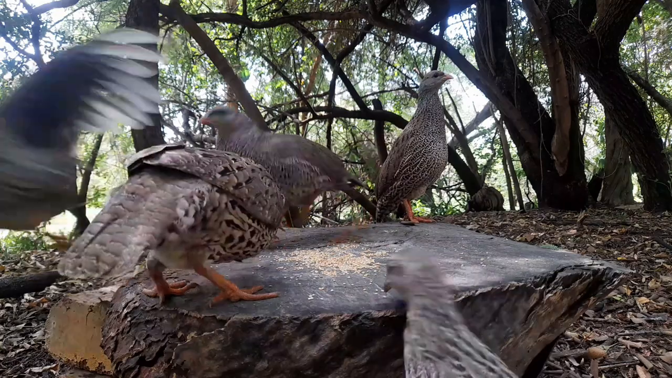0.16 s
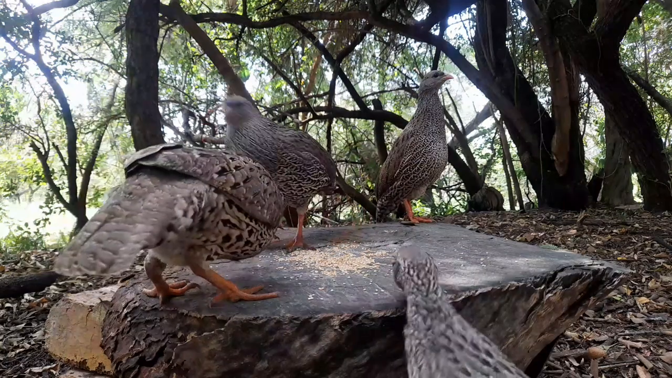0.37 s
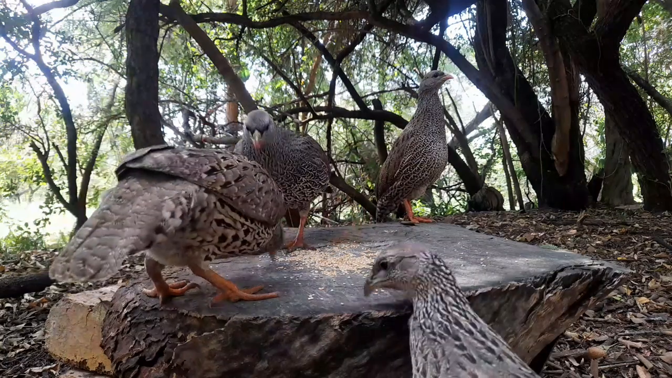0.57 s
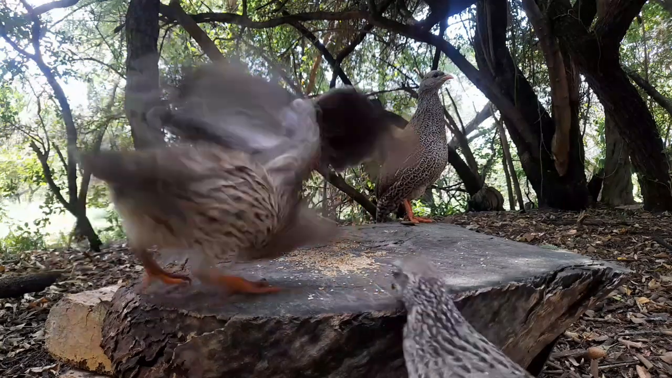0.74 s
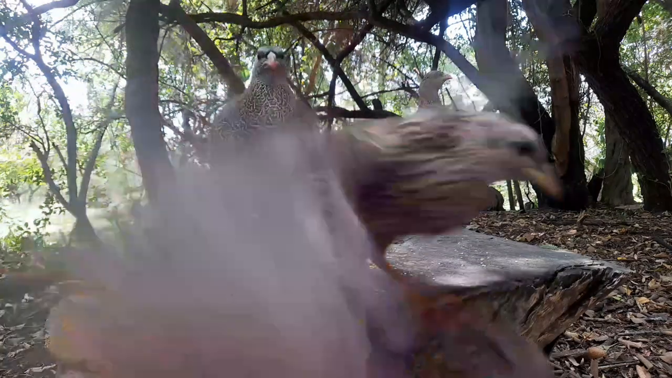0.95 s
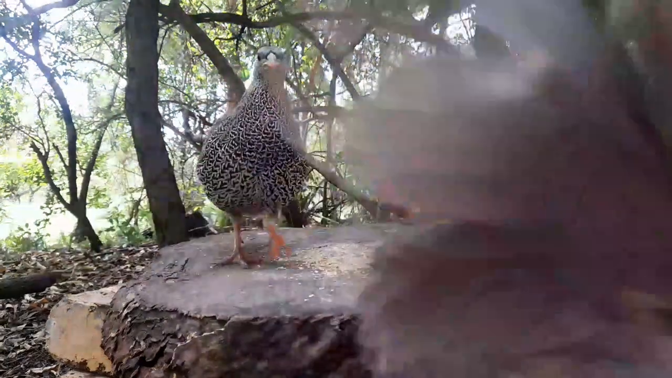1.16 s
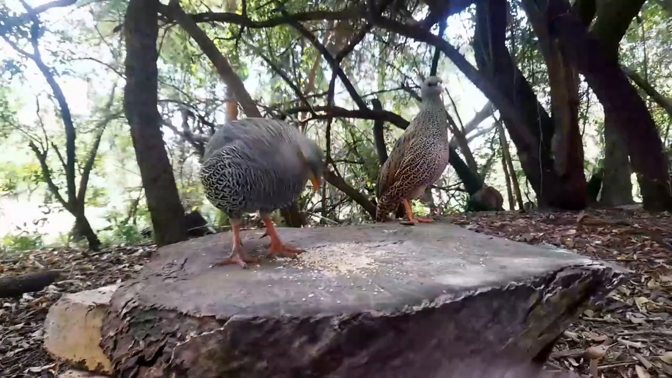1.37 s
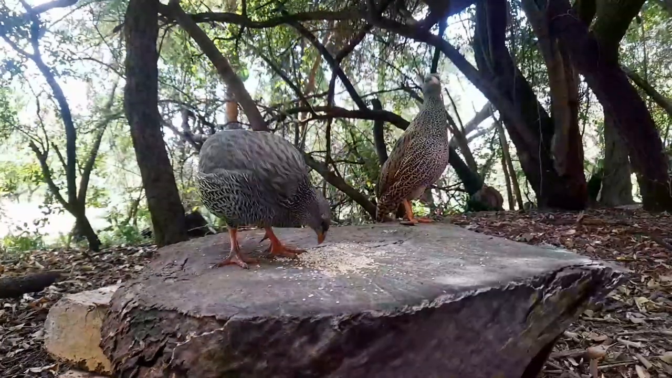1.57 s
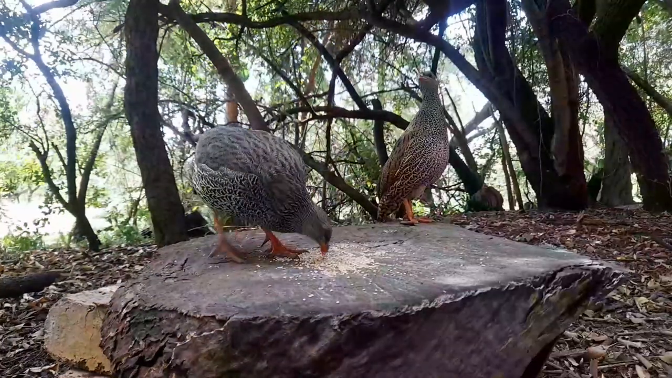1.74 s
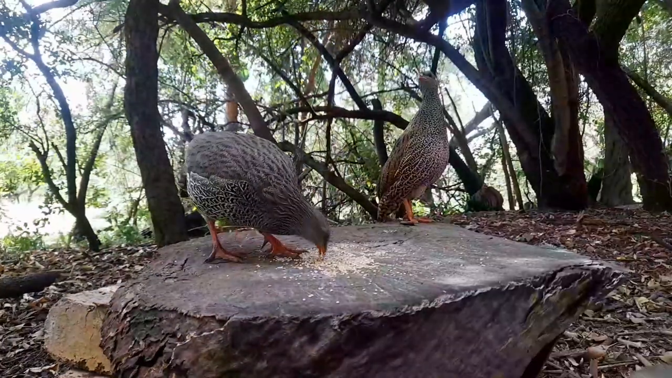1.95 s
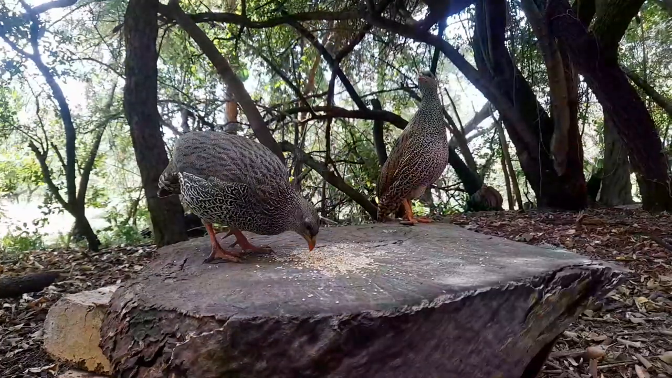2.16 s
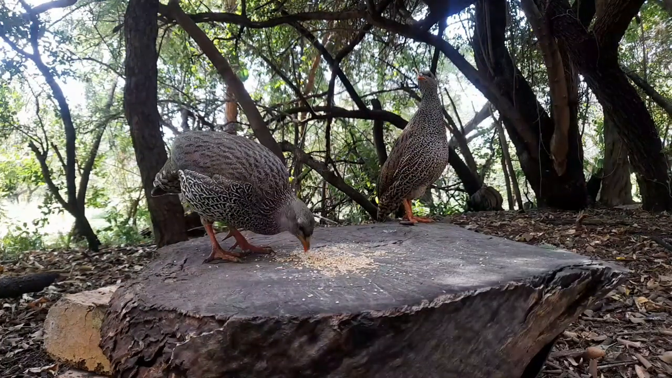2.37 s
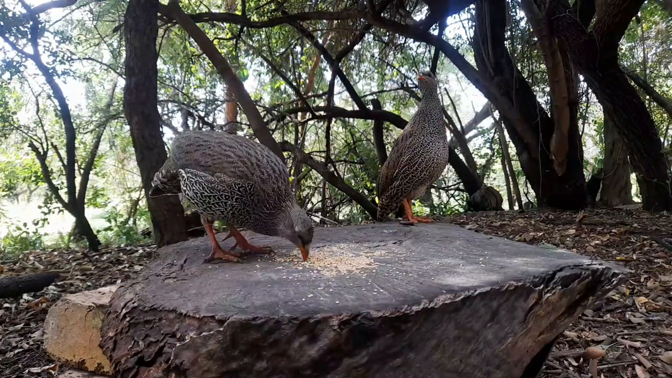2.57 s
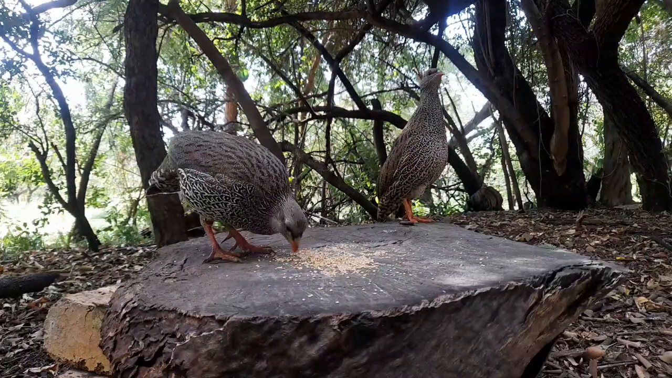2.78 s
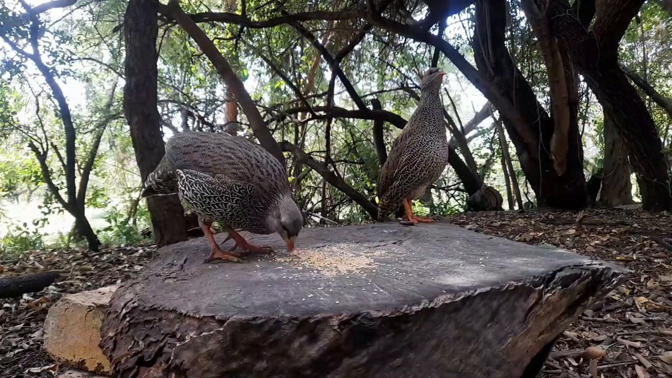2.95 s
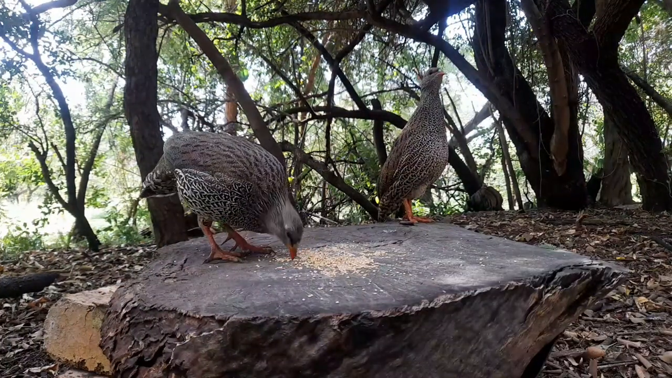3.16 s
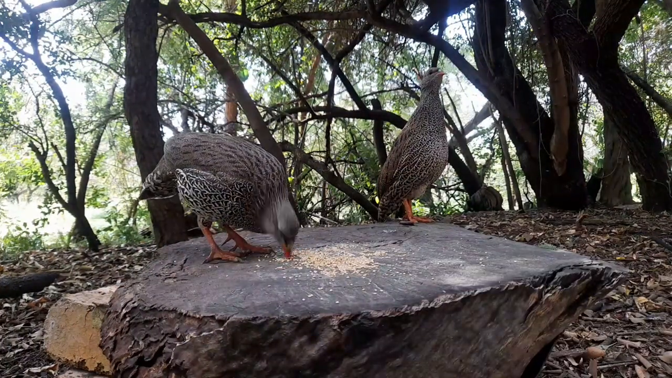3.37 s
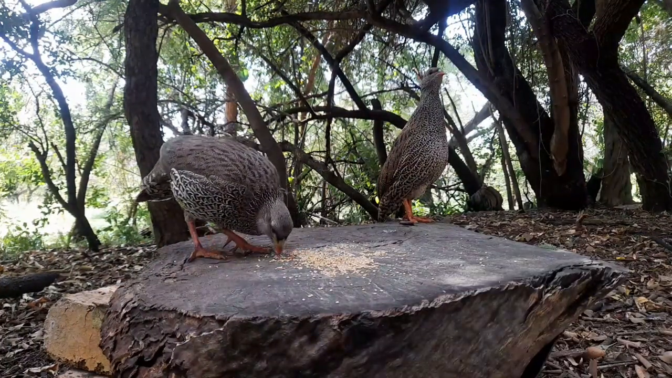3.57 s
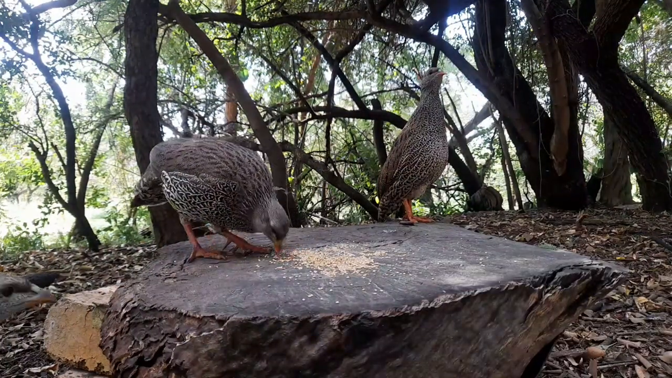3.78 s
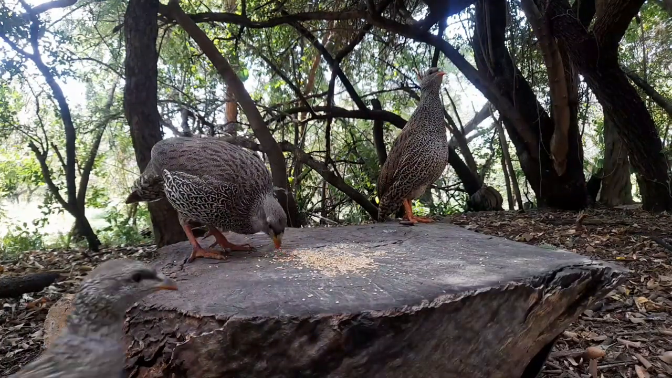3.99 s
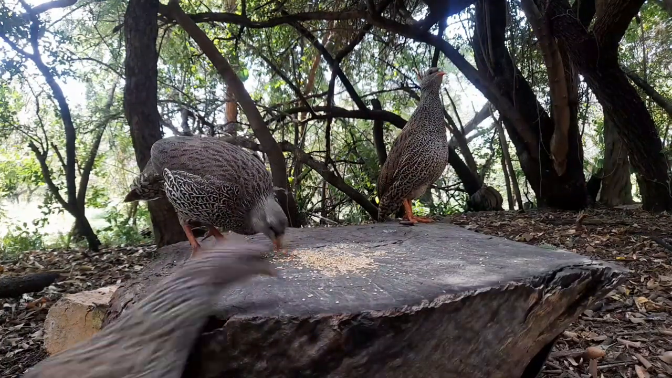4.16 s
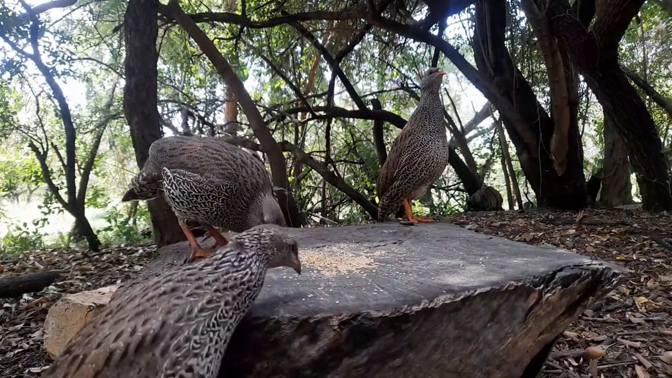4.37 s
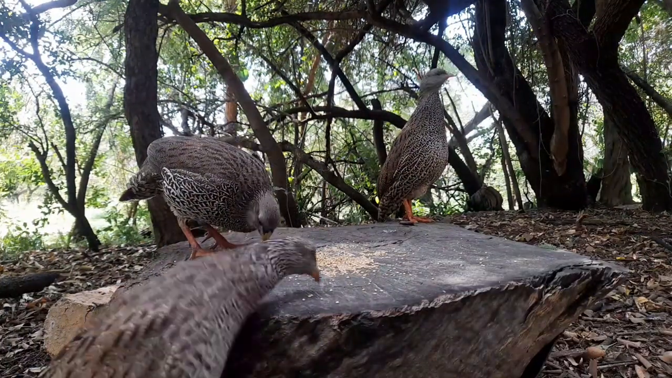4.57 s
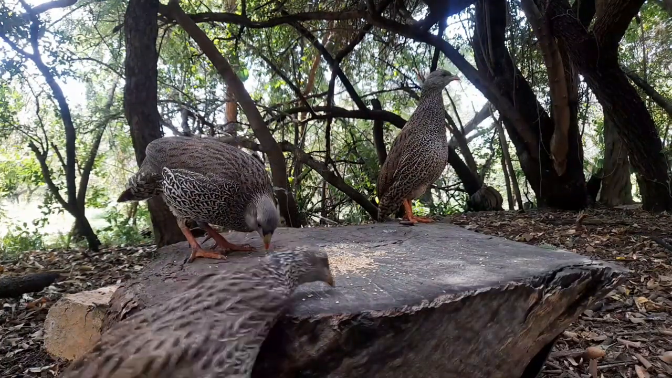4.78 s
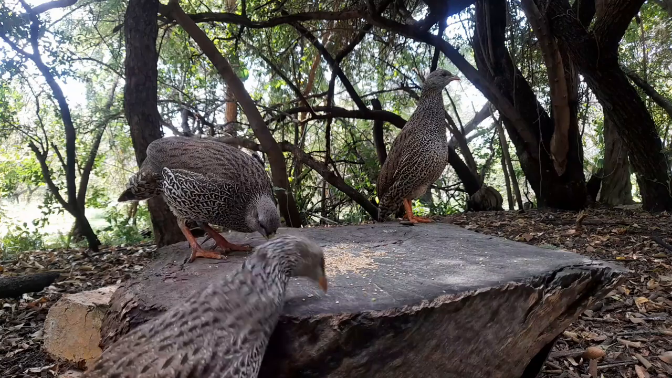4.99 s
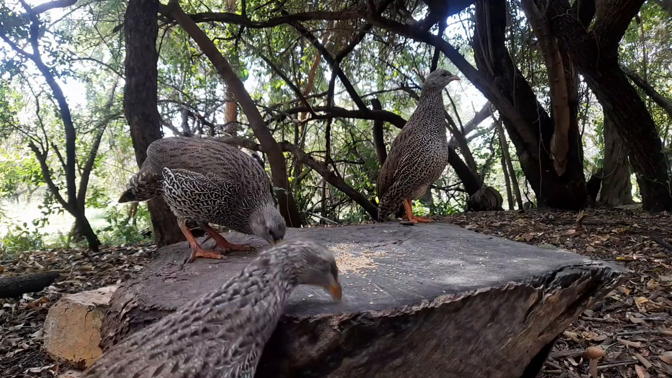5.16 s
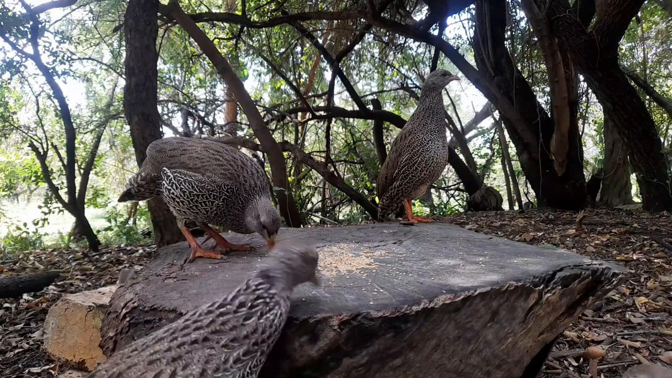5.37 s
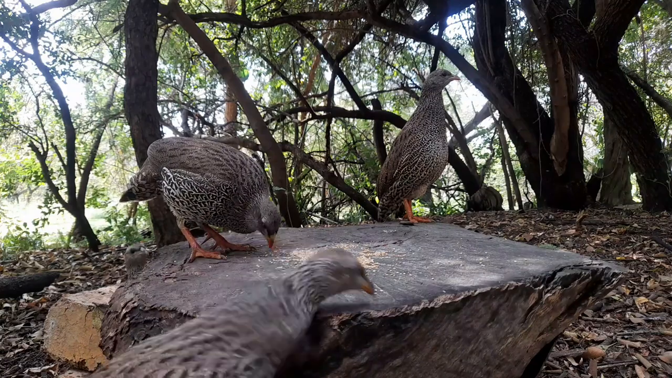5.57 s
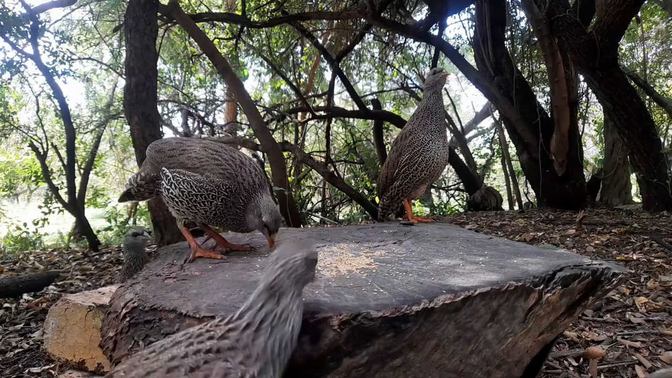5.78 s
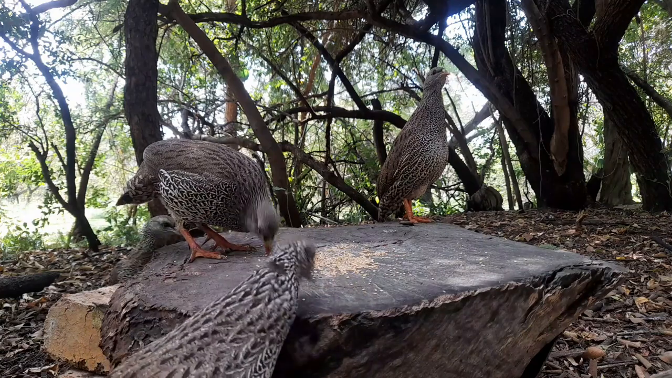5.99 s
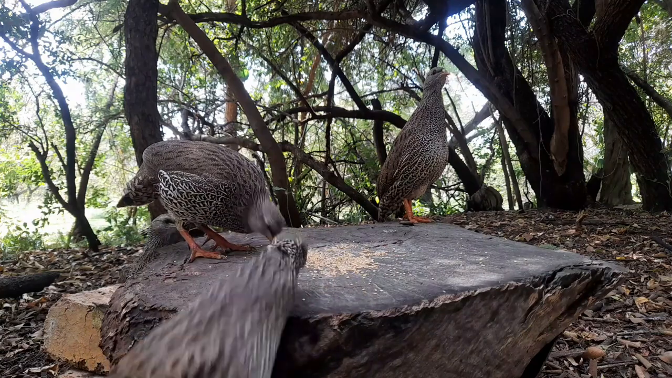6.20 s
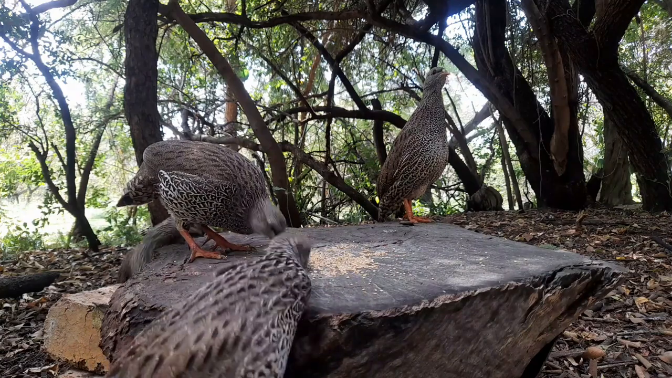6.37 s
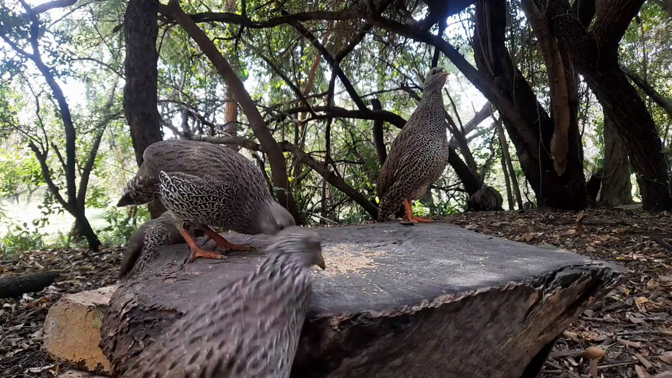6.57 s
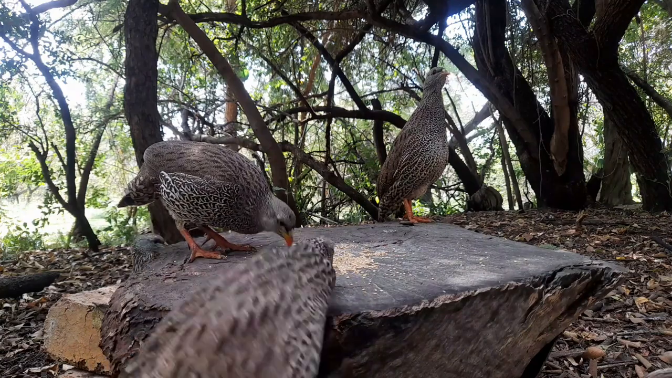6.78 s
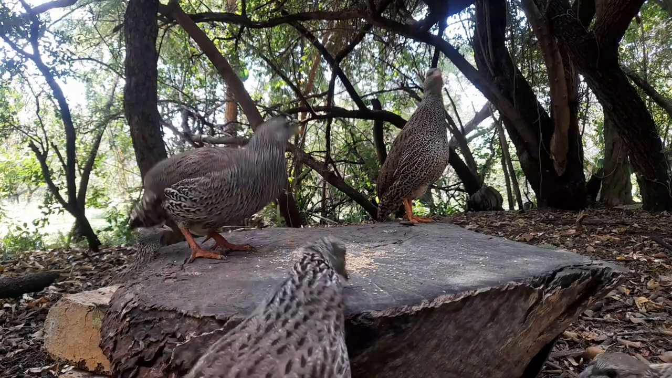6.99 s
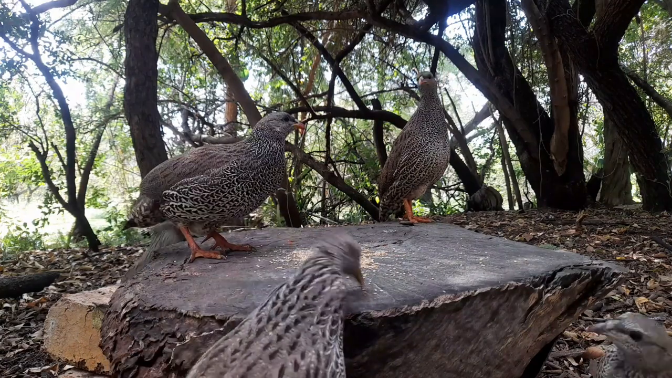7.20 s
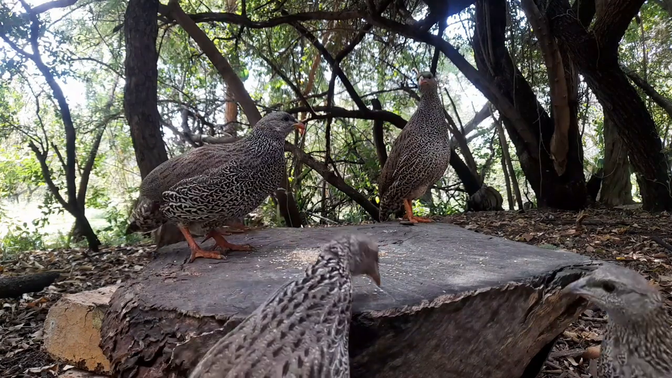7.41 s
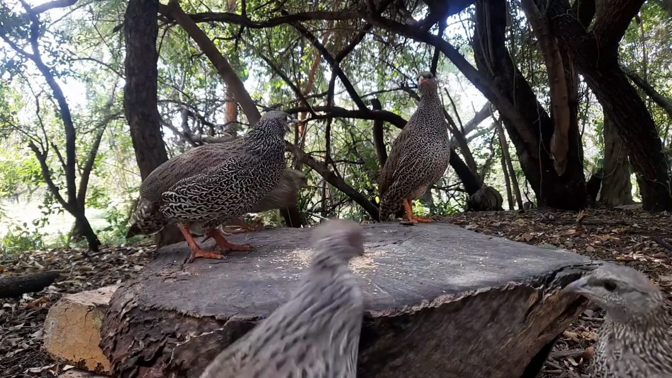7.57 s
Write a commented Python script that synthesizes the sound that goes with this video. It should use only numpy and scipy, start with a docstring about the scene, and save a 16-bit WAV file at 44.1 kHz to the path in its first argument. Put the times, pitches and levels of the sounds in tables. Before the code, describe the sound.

Several ground birds feed at a wooden stump in quiet woods. Bright, short peeps slide down and flick upward. Within the first second one bird is driven off with piercing screams and heavy wingbeats right beside the microphone. Then it calms to sparse, fainter peeps, beak ticks, leaf rustle and dull wooden taps, with peeping growing busier and a few hoarse clucks in the middle. Near calls are almost dry, with a soft tree echo.

```python
"""Short peeping whistles that fall and then flick up come from ground fowl crowding round seed on a stump.
One bird is chased off with screams and wingbeats close to the microphones; a farther bird trills.
Calls are gliding tones with overtones and breath noise; feathers, litter, wings and a low murmur of air
are shaped noise; feet and beaks make the stump ring; trunks in the wood send back a soft echo."""
import sys
import numpy as np
from scipy import signal
from scipy.io import wavfile
from scipy.ndimage import uniform_filter1d

SR = 44100
rng = np.random.default_rng(int(sys.argv[2]) if len(sys.argv) > 2 else 0)


def volts_from_decibels(level):
    """Turn decibel levels (scalar or array-like) into linear amplitude factors."""
    exponent = np.asarray(level, float) / 20
    return 10 ** exponent


def to_wav(s):
    """Save 16-bit WAV."""
    ch = np.atleast_2d(s).T  # columns
    pcm = np.round(np.clip(ch, -1, 1) * 32767)  # PCM
    wavfile.write(sys.argv[1], SR, pcm.astype(np.int16))


N = 336924   # samples in the scene


def size_of(s):
    """Samples in a time in seconds."""
    return round(s * SR)


def rms_one(x):
    """Scales a signal to an rms of 1."""
    return x / np.sqrt(np.mean(x ** 2) + 1e-20)


def band_noise(noise, order, low_hz, high_hz):
    """Noise kept only between two frequencies."""
    return signal.sosfilt(signal.butter(order, [low_hz, high_hz], "band", fs=SR, output="sos"), noise)


def drift(rate_hz):
    """Slow random wandering with a spread of 1; a higher rate wanders faster."""
    # made at one point per 40 samples, after a run-in, then joined by straight lines
    r = np.exp(-80 * np.pi * rate_hz / SR)
    slow = signal.lfilter([1], [1, -2 * r, r * r], rng.standard_normal(N // 40 + 2002))[2000:]
    return np.interp(np.arange(N) / 40, np.arange(len(slow)), rms_one(slow))


def curve(rows):
    """Turns rows of (seconds, dB) into a gain for every sample."""
    s, db = np.transpose(rows)
    return volts_from_decibels(np.interp(np.arange(N) / SR, s, db))


def coloured(spectrum, patchy_db, source):
    """Stereo noise in half-octave bands, each with its own level, flicker and left-right likeness; rms 1."""
    # How alike left and right are. Each row: frequency in Hz, likeness from 0 to 1.
    likeness = [(100, .65), (700, 0.45), (5000, 0.03)]
    out, edges = 0, 30 * 2 ** np.arange(0, 9.6, .5)
    for k, (low, high) in enumerate(zip(edges, edges[1:])):
        # neighbouring bands take turns between two pairs of noises
        mid, side = band_noise(source[k % 2], 2, low, high)
        middle = np.log(low * high) / 2
        level_db, alike = (np.interp(middle, np.log(np.array(p)[:, 0]), np.array(p)[:, 1])
                           for p in (spectrum, likeness))
        alike = np.clip(alike, 0, 1)
        stereo = np.sqrt(1 + alike) * mid + np.sqrt(1 - alike) * side * [[1], [-1]]
        out = out + volts_from_decibels(level_db + patchy_db * drift(22.0)) * stereo
    return rms_one(out)


def add(out, start_s, hz, db, overtone_db, pan_db, lag_ms, wobble_db, rough):
    """Adds a gliding whistle with overtones, shaken by breath noise, reaching one microphone before the other."""
    # Resonances and a notch that colour the overtones.
    # Each row: frequency in Hz, half width in Hz, lift in dB.
    tract = [(1550, 300, 6.0), (3400, 350, -7.0), (4800, 900, 5.5)]
    at, n = size_of(start_s), np.arange(len(hz))
    phase = 2 * np.pi * np.cumsum(hz) / SR
    tone = np.sin(phase)
    for k in range(2, 7):
        lift_db = sum(top_db / (1 + ((k * hz - at_hz) / width_hz) ** 2) for at_hz, width_hz, top_db in tract)
        # the throat passes overtones up to its edge in Hz and chokes them above
        passed = volts_from_decibels(overtone_db * (k - 1) ** .7 + lift_db) / (1 + (k * hz / 5800.0) ** 12)
        # choked overtones still leak out faintly, more from a loud call
        leak = volts_from_decibels(-22 + .4 * db) * (k * hz > 6800) * (k * hz < .4 * SR)
        tone += (passed + leak) * np.sin(k * phase)
    slow_breath = signal.butter(3, 900, fs=SR, output="sos")
    breath = rms_one(signal.sosfilt(slow_breath, rng.standard_normal(len(n))))
    tone = tone * (1 + rough * breath)
    soft_ends = np.minimum(1, np.minimum(n, n[::-1]) / 70)
    tone = tone * volts_from_decibels(db + wobble_db[max(at, 0) + n]) * soft_ends
    for side, sign in enumerate((1, -1)):   # left, then right
        heard = np.interp(n - sign * lag_ms * SR / 2000, n, tone) * volts_from_decibels(sign * pan_db / 2)
        out[side, max(at, 0):at + len(n)] += heard[max(-at, 0):]


def murmur():
    """A low murmur of air: coloured noise that swells in slow gusts."""
    # Strength of the gusts. Each row: time in seconds, level in dB before a small random drift.
    gusts = [(0, -60), (.7, -64), (1.5, -72), (2.0, -70), (2.3, -58.5), (2.9, -67), (3.2, -63), (3.6, -67),
             (4.7, -62), (5.3, -66), (6.2, -64), (6.8, -69), (7.3, -65)]
    # Colour of the murmur. Each row: frequency in Hz, relative level in dB per Hz.
    spectrum = [(18, -36), (30, -13), (103, -0.5), (184, -17.5), (319, -15), (554, -37.5), (1040, -33.5),
                (3220, -58.5), (10800, -39.5), (16000, -32)]
    noise = coloured(spectrum, 0.51, rng.standard_normal((2, 2, N)))
    return curve(gusts) * volts_from_decibels(1.5 * drift(5.0)) * noise


def trees(x, t60):
    """Trunks scatter the treble back as a dying cloud of echoes, different at each microphone."""
    t = np.arange(size_of(.4)) / SR
    echoes = rng.standard_normal((2, len(t))) * volts_from_decibels(-60 * t / t60) * np.minimum(1, t / .008)
    echoes = band_noise(echoes, 2, 1900.0, 5000.0)
    return signal.fftconvolve(x, echoes / np.sqrt(np.sum(echoes ** 2) / 2), axes=1)[:, :N]


def trill(wobble_db):
    """Evenly spaced far notes arch in pitch, droop and fade, fluttering from the long path through the trees."""
    # Bouts of notes. Each row: first note in seconds, gap in seconds, highest pitch in Hz, its time in
    # seconds, droop in Hz per second squared, arch as a share of the pitch, level at the highest in dB,
    # fade away from there in dB per second, left over right in dB, lag of the left in ms.
    bouts = [(.014, .06, 2930, .08, 4500, .075, -46, 16, .5, -.09),
             (3.351, .0972, 2720, 3.53, 3300, .23, -48, 30, -6.5, .1)]
    notes_per_bout = 7
    first_flat = .33   # the first note falls short of its pitch by this share of its arch
    out, u = np.zeros((2, N)), np.linspace(-1, 1, size_of(.056))
    for first, gap, top_hz, top_s, droop, arch, db, fade_db, pan_db, lag_ms in bouts:
        for s in first + gap * np.arange(notes_per_bout):
            crest_hz = top_hz - droop * (s - top_s) ** 2 - first_flat * arch * top_hz * (s == first)
            hz = crest_hz * (1 - arch * abs(u) ** 2.3)
            level_db = db - fade_db * abs(s - top_s) - 11.0 * u ** 2
            add(out, s - len(u) / SR / 2, hz, level_db, -35.0, pan_db, lag_ms, wobble_db, rough=.1)
    lag = size_of(0.042)
    out[:, lag:] += .27 * out[:, :-lag].copy()   # one slap off a broad trunk
    return out


def thuds():
    """Feet and beaks ring the dull modes of the stump; a harder blow favours the higher ones."""
    # Blows on the stump. Each row: time in seconds, strength in dB before the contact softens it,
    # hardness in dB per octave.
    blow_rows = [(0.422, -44, 0.0), (2.055, -55, 8.0), (3.179, -49, -3.0), (5.337, -62, 6.0),
                 (5.801, -53, -4.0), (7.203, -53, 0.0), (7.234, -55, 3.0)]
    # Ringing modes of the stump. Each row: frequency in Hz, relative level in dB,
    # time to fade by 60 dB in seconds.
    modes = [(270, 7, 0.022), (410, -1, 0.008), (1100, -8, .006)]
    (s, strike_db, hardness), out = np.transpose(blow_rows), 0
    for hz, db, t60 in modes:
        blows = np.zeros(N)
        blows[(s * SR).astype(int)] = volts_from_decibels(strike_db + hardness * np.log2(hz / modes[0][0]))
        blows = signal.lfilter([.15], [1, -.85], blows)   # the contact lasts a moment
        r, w = volts_from_decibels(-60 / (t60 * SR)), 2 * np.pi * hz / SR
        ring = [1, -2 * r * np.cos(w), r * r]
        out = out + signal.lfilter([0, volts_from_decibels(db) * np.sin(w)], ring, blows + 1e-18)
    return out


def rustle():
    """Grainy noise: a thin bed with stray seed ticks as birds stir, and bursts that swell and die."""
    # Birds stirring in the leaf litter. Each row: time in seconds, level in dB before the common lift below.
    stirring = [(0, -70), (.74, -70), (.8, -57), (1.32, -58), (1.36, -65), (1.65, -72), (2.6, -79),
                (3.3, -76), (5.0, -77), (7.64, -71.5)]
    # Beak ticks, scuffs and feather shakes. Each row: start in seconds, level in dB before the
    # common lift below, length in seconds, left over right in dB.
    bursts = [(0.409, -51, 0.023, 11.5), (0.613, -57, 0.011, 12), (.735, -52, .002, 3),
              (0.768, -42, 0.045, 6), (1.07, -53, .03, -6), (1.254, -48, 0.008, -6),
              (1.27, -40.5, 0.0035, -6.5), (1.31, -51, 0.022, -5.5), (1.412, -60, .01, -8),
              (1.434, -55, 0.015, -8), (1.496, -63.5, 0.067, -7.5), (1.537, -61, 0.017, -4.5),
              (2.142, -59, 0.0072, 1), (2.26, -67, 0.011, 14.5), (3.17, -65, 0.005, 6.5),
              (3.196, -59, 0.012, -6), (4.073, -60.5, 0.01, 3.5), (4.179, -51.5, 0.0018, 6.5),
              (4.283, -55.5, 0.012, -0.5), (4.458, -59, 0.035, 0), (5.453, -61, 0.0013, -9),
              (5.824, -54.5, 0.002, 7.5), (6.076, -68.5, 0.068, -5), (6.501, -63, 0.008, 0),
              (6.878, -59, 0.027, 3), (6.95, -58, 0.0039, 6), (7.201, -56, 0.012, 6),
              (7.281, -61, 0.03, -4), (7.429, -59.5, 0.0014, -3)]
    # Colour of the rustling. Each row: frequency in Hz, relative level in dB per Hz.
    colour = [(88, -32), (150, -3.5), (2180, -9), (3160, -12.5), (4000, -0.5), (8230, -11), (12700, -4.5),
              (16000, -19.5)]
    # about ten ticks a second, of uneven strength
    ticks = (rng.random(N) < 10 / SR) * volts_from_decibels(5 * np.minimum(rng.exponential(1, N), 3))
    bed = volts_from_decibels(2 * drift(4.1)) + signal.lfilter([.8], [1, -.98], ticks)
    gain = np.ones((2, 1)) * curve(stirring) * bed
    for s, db, length, pan_db in bursts:
        t = np.arange(size_of(length + 0.066)) / SR
        swell = np.minimum(1, .3 + 4 * t / length)
        die = .5 * np.exp(-(t - length) / (.004 + .4 * length))
        level = volts_from_decibels(db + np.array([[.5], [-.5]]) * pan_db)
        gain[:, size_of(s):size_of(s) + len(t)] += level * np.where(t < length, swell, die)
    grains = rng.standard_normal((2, 2, N)) * volts_from_decibels(3.5 * drift(250.0))
    return volts_from_decibels(6.2) * gain * coloured(colour, 2.7, grains)


def wings():
    """Each beat throws low air pressure and a swish at the microphones, partly its own at each; feathers slap."""
    # Wingbeats. Each row: time in seconds, level in dB before the left-right tilt.
    beat_rows = [(.776, -30), (.86, -36), (.95, -36), (1.054, -35.5), (1.15, -38.5), (1.23, -40),
                 (1.268, -32)]
    # Slaps of the wing feathers. Each row: time in seconds, level in dB before the left-right tilt.
    clap_rows = [(.777, -33), (1.0, -40), (1.12, -40), (1.232, -36), (1.257, -36)]
    t = np.arange(N) / SR
    beats = sum(volts_from_decibels(db) * np.exp(-abs(t - s) / np.where(t < s, .01, .028)) for s, db in beat_rows)
    # own noise at each microphone plus a shared part
    push = rng.standard_normal((2, N)) + 1.1 * rng.standard_normal(N)
    push = band_noise(push, 2, 45.0, 130.0)
    swish = band_noise(rng.standard_normal((2, N)), 1, 150.0, 900.0)
    claps = sum(volts_from_decibels(db) * (t >= s) * np.exp(-abs(t - s) / .004) for s, db in clap_rows)
    slap = rng.standard_normal(N) + .4 * rng.standard_normal((2, N))
    slap = band_noise(slap, 2, 300.0, 2200.0)
    air_moved = rms_one(push) + volts_from_decibels(-7.0 + 4 * drift(60.0)) * rms_one(swish)
    beating = volts_from_decibels([[-1.3], [1.3]]) * beats * air_moved
    return beating + volts_from_decibels([[-2.5], [2.5]]) * claps * rms_one(slap)


def rasp(calls):
    """Air hissing through the throat follows the loudness of the calls."""
    effort = signal.lfilter([.003], [1, -.997], abs(calls))
    hiss = band_noise(rng.standard_normal((2, N)), 3, 1500.0, 6500.0)
    return volts_from_decibels(-22.5) * effort * rms_one(hiss)


def clucks(wobble):
    """Each hoarse cluck leaps to a thin crest, then sinks, filling out and growing reedy."""
    # Low clucks. Each row: start in seconds, length in seconds, crest pitch in Hz,
    # pitch it sinks to in Hz, peak level in dB before flutter.
    cluck_rows = [(.172, .063, 1323, 790, -37), (4.203, .058, 1223, 660, -40),
                  (4.418, .06, 1272, 790, -37.5)]
    opening, rise, sag = .4, .4, 2.2   # first pitch over crest; share of the length spent rising; bend of the fall
    crest_db, peak_at, end_db = -11, .75, -7   # thin at the crest, fullest late in the fall
    lift_hz = 250   # a cluck turns up at its very end
    out = np.zeros((2, N))
    for s, length, crest_hz, last_hz, db in cluck_rows:
        u = np.linspace(0, 1, size_of(length))
        sink = np.clip((1 - u) / (1 - rise), 0, 1) ** sag
        rising_hz = crest_hz * (1 - (1 - opening) * (1 - u / rise) ** 2)
        sinking_hz = last_hz + (crest_hz - last_hz) * sink + lift_hz * u ** 8
        hz = np.where(u < rise, rising_hz, sinking_hz)
        hz = uniform_filter1d(hz, size=300, mode="nearest")
        hz = hz + 30.0 * wobble[size_of(s + length):][:len(u)]
        level_db = np.interp(u, [0, rise, peak_at, 1], [crest_db - 5.0, crest_db, 0, end_db])
        add(out, s, hz, db + level_db, -11 - 8.0 * sink, pan_db=.9, lag_ms=-.06,
            wobble_db=1.6 * wobble, rough=.3)
    return out


def cries(wobble):
    """Screams and squeals glide freely, rounded at the turns and unsteady in pitch."""
    # Screams and squeals, one list of rows each. Each row: time in seconds, pitch in Hz before
    # smoothing and wobble, level in dB before flutter.
    glides = [
        [(0.0, 1560, -46), (0.014, 1100, -52)],
        [(0.017, 600, -48), (0.049, 2800, -52), (0.066, 2100, -32), (0.088, 1250, -41), (0.095, 950, -35),
         (0.107, 640, -39)],
        [(0.45, 2160, -66), (0.465, 2510, -58.5), (0.5, 1813, -49), (0.515, 2370, -58), (0.53, 1547, -52.5),
         (0.545, 1500, -52), (0.568, 790, -43), (0.594, 663, -46)],
        [(0.645, 3850, -52), (0.69, 3700, -53)],
        [(0.695, 4500.0, -57), (0.725, 4800, -44.5), (0.738, 5900, -44), (0.755, 5100, -30), (0.776, 4900, -34),
         (.787, 4200, -34)],
        [(0.782, 3490, -40), (0.794, 2720, -12.5), (0.812, 2230, -12.5), (0.82, 1950, -28),
         (0.828, 1750, -55.5)],
        [(0.8638, 700, -25), (0.8685, 800, -24), (0.8705, 1400, -26), (0.8725, 2300, -19), (0.8765, 2800, -21)],
        [(0.8752, 3600, -16), (0.881, 5300, -22), (0.89, 5630, -25), (0.9, 4950, -24.5), (0.927, 4650, -20),
         (0.934, 2695, -29), (0.941, 735, -30)],
        [(0.998, 820, -32), (1.01, 2440, -52), (1.025, 3080.0, -49.5), (1.045, 2950.0, -58.5),
         (1.06, 2430, -38.5), (1.085, 1880, -31), (1.102, 1750, -62)],
        [(1.154, 1613, -54), (1.165, 4730, -44), (1.197, 6500, -33), (1.218, 6550, -34.5), (1.235, 5790, -30),
         (1.26, 5620, -38), (1.29, 4550, -33.5), (1.31, 2650, -40), (1.328, 1980.0, -41)],
        [(6.898, 3180, -60), (6.908, 4115, -38), (6.92, 4100, -32.5), (6.94, 3660.0, -33.5), (6.972, 3000, -46)],
        [(7.378, 2000.0, -50), (7.41, 1650, -51), (7.44, 1074, -66)],
    ]
    # One row for each cry: overtone level in dB, left over right in dB, lag of the left in ms.
    voices = [(-20, 1, -.09), (-14, 1, -.09), (-16.5, -.5, -.06), (-25, -1, -.09), (-25, 2.5, -0.076),
              (-2, 2, -.055), (-.4, -3.5, .1), (-16.5, -4, 0.21), (-8.5, -9, -0.247), (-7, -12, .05),
              (-28, 2.5, 0.057), (-18, -1, -.06)]
    out = np.zeros((2, N))
    for rows, voice in zip(glides, voices):
        s, hz, db = np.transpose(rows)
        t = np.arange(s[0], s[-1], 1 / SR)
        pitch_hz = uniform_filter1d(np.interp(t, s, hz), size=min(len(t) // 12, 200), mode="nearest")
        pitch_hz += 25 * wobble[size_of(s[-1]):][:len(t)]
        # straight lines between the square roots of the gains
        level_db = 40 * np.log10(np.interp(t, s, volts_from_decibels(db / 2)))
        add(out, s[0], pitch_hz, level_db, *voice, 1.2 * wobble, rough=.1)
    return out


def peeps(wobble):
    """Each peep slips in from below, slides down swelling, then flicks up over a crest in its bird's manner."""
    # Contact peeps. Each row: bird, time of the lowest pitch in seconds, lowest pitch in Hz and crest pitch
    # in Hz before smoothing, peak level in dB before flutter, level of the flick against the peak in dB.
    peep_rows = [("steep", .269, 2010, 6200, -28, -23), ("low", .382, 1737, 3600, -38.5, -18),
                 ("short", .631, 2182, 3850, -32, -12), ("high", .734, 2520, 5250, -38, -3),
                 ("low", 1.566, 1924, 4560, -46.5, -3.5), ("steep", 1.747, 2250, 5980, -56.5, -8),
                 ("high", 1.874, 2616, 6420, -46, -5.5), ("short", 1.891, 2030, 3570, -57, -8),
                 ("steep", 2.075, 2174, 6360, -54, -10), ("low", 2.182, 1840, 5050, -41.5, -12),
                 ("high", 2.27, 2418, 5420, -49.5, 2), ("steep", 2.513, 2188, 6500, -50, -4),
                 ("low", 2.843, 2048, 4400, -61.5, -9), ("steep", 3.074, 1800, 4850, -57, 12),
                 ("high", 3.251, 2730, 5360, -44, -4), ("steep", 3.302, 1982, 6680, -41, -17),
                 ("high", 3.75, 2610, 6570, -41, -7), ("short", 3.757, 2173, 2600, -43, -12),
                 ("low", 4.026, 1695, 4320, -37, -11.5), ("high", 4.16, 2685, 5700, -44, -6),
                 ("short", 4.496, 1804, 3370, -44.5, -3), ("high", 4.556, 2400, 5510, -25, -10.5),
                 ("low", 4.78, 1940, 3400, -54, -11), ("low", 5.019, 1750, 4520, -38, -11),
                 ("steep", 5.028, 1950, 5800, -46.5, -8), ("high", 5.271, 2582, 6500, -34.5, -22),
                 ("low", 5.384, 1528, 4250, -38, -17), ("steep", 5.518, 1873, 6730, -47, -1),
                 ("steep", 5.707, 2130, 6330, -58, -6), ("low", 5.778, 1854, 4050, -51, -14),
                 ("short", 5.981, 1890, 4240, -45.5, -19), ("steep", 6.001, 2030, 5600, -57, -2),
                 ("high", 6.271, 2434, 5980, -39, -12), ("low", 6.272, 1964, 4560, -53, 2),
                 ("high", 6.39, 2355, 5120, -57, -19), ("high", 6.689, 2306, 5400, -32, -16),
                 ("short", 6.976, 1670, 2770, -40.5, -8), ("high", 7.06, 2330, 4300, -59, -14),
                 ("low", 7.187, 1795, 4140, -51, -19.5), ("high", 7.335, 2384, 5640, -30, -19),
                 ("short", 7.36, 1710, 3240, -45.5, -3), ("low", 7.531, 1870, 4860, -47.5, -3),
                 ("short", 7.577, 1560, 2000, -56, -12), ("high", 7.588, 2426, 5240, -44, -11)]
    # Four peeping birds by name. Each row: pitch at the start over the lowest, lead-in from below in Hz,
    # fall in seconds, flick in seconds, overtone level in dB before brightness and throat act,
    # fade over the crest in dB, left over right in dB and lag of the left in ms before the head turns.
    birds = {"low": (1.35, 1000, .038, .032, -19, -2.0, -1.5, -.03),
             "high": (1.35, 250, .038, .028, -16, -10.0, -1.1, -.055),
             "steep": (1.75, 50, .046, .029, -13.5, -9.5, -5.5, .15),
             "short": (1.7, 50, .042, .02, -16, -9.0, -3.1, .1)}
    lead_s, peak_lead = .012, .15   # lead-in time; share of the fall already at full strength
    fall_power, rise_power, swell_power = 1.8, 1.35, 1.8   # bends of the pitch and of the swelling
    hold, drop = .27, .16   # shares of the flick held full and thinning
    out, chance = np.zeros((2, N)), rng.standard_normal((len(peep_rows), 2))   # the head turns
    for (bird, s, low_hz, crest_hz, db, flick_db), (turn, tilt) in zip(peep_rows, chance):
        start, lead_hz, fall, flick, overtone_db, fade_db, pan_db, lag_ms = birds[bird]
        t = np.arange(-fall - lead_s, 1.5 * flick, 1 / SR)
        # u runs from -1 (start of the fall) through 0 (lowest pitch) to 1 (crest) and beyond
        u = np.maximum(np.where(t < 0, t / fall, t / flick), -1)
        lead = np.maximum(-t - fall, 0) / lead_s
        falling_hz = (start - 1) * low_hz * abs(u) ** fall_power - lead_hz * lead ** 2
        rise = np.sin(np.pi / 2 * np.maximum(u, 0) ** rise_power) ** 2
        hz = low_hz + np.where(u < 0, falling_hz, (crest_hz - low_hz) * rise)
        after_db = np.interp(u, [0, hold, hold + drop, 1.1, 1.5],
                             [0, -1.2, flick_db, flick_db + fade_db, flick_db + 2 * fade_db - 7])
        # a flick is thin until it reaches the throat's band: 5 dB per octave below 4200 Hz
        after_db += np.clip((u - hold) / drop, 0, 1) * 5.0 * np.minimum(np.log2(hz / 4200), 0)
        # a loud peep swells from farther under its peak
        swell_db = 23 + 1.2 * (db + 45)
        before_db = -swell_db * np.maximum(-u - peak_lead, 0) ** swell_power - 12.0 * lead
        level_db = np.where(u < 0, before_db, after_db)
        hz = uniform_filter1d(hz, size=200, mode="nearest")
        # an open beak lets out both the flick and the overtones
        bright_db = .7 * (min(flick_db, 1.5) + 9)
        # overtones weaken below the throat's band: 14 dB per octave below 5000 Hz
        throat_db = 14 * np.minimum(np.log2(2 * hz / 5000), 0)
        # faint peeps come from farther off and arrive blurred
        rough = .055 + .025 * max(-50 - db, 0)
        add(out, s + t[0], hz, db + level_db, overtone_db + bright_db + throat_db,
            pan_db + 1.5 * tilt, lag_ms + .015 * turn, wobble, rough)
    return out


def scene():
    """Near calls are nearly dry and the far trill is wet, over rustling, wings, thuds and murmuring air."""
    wobble = drift(150.0)
    near = peeps(wobble) + clucks(wobble) + cries(wobble)
    far = trill(2.2 * wobble)
    echo = trees(volts_from_decibels(-28.0 + 3.0 * wobble) * near + volts_from_decibels(-16.0) * far, t60=.25)
    return near + rasp(near) + far + echo + rustle() + wings() + thuds() + murmur()


def low_pass(x):
    """Removes everything above the highest recorded frequency."""
    return signal.sosfilt(signal.butter(12, 16670, fs=SR, output="sos"), x)


def record(dry):
    """A noise suppressor pulls the sound down while the mid band is quiet and lets go when a call comes."""
    band = band_noise(dry.mean(axis=0), 2, 1500, 7000)
    level_db = 10 * np.log10(uniform_filter1d(band ** 2, size=2000) + 1e-12)
    gain_db = -6.0 / (1.5 + np.exp((level_db + 64.5) / 8.5))   # at most 4 dB down
    return low_pass(dry * volts_from_decibels(gain_db))


dry = scene()
out = record(dry)
to_wav(out)
```